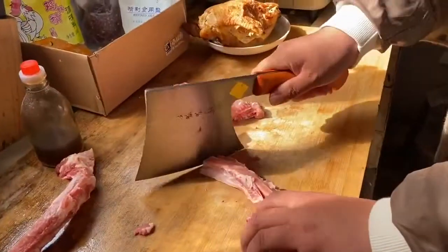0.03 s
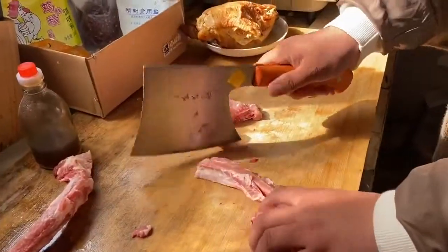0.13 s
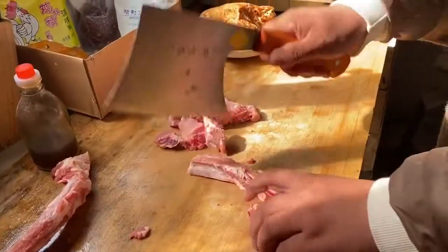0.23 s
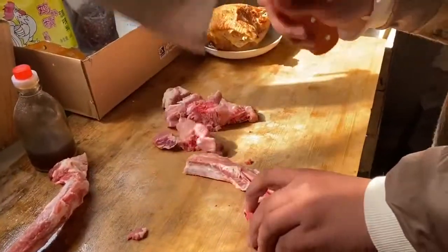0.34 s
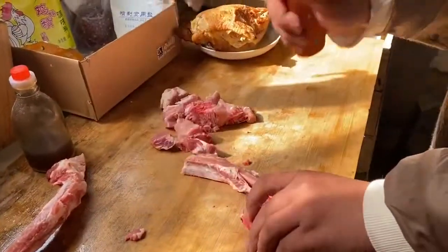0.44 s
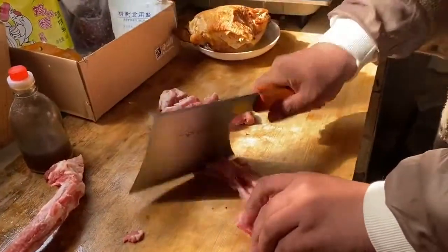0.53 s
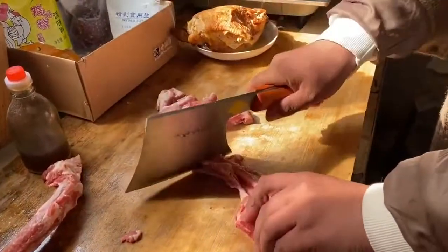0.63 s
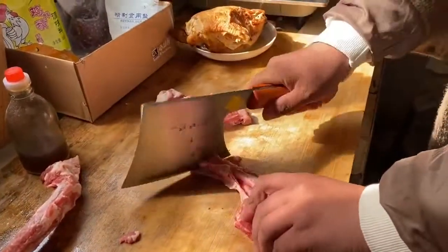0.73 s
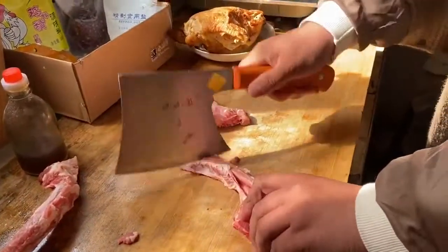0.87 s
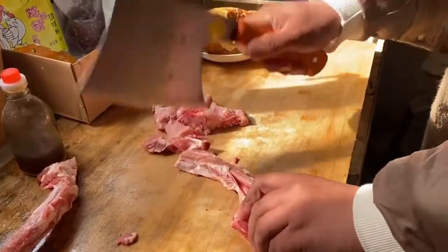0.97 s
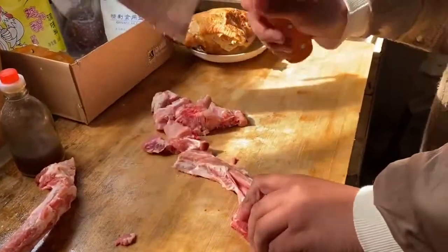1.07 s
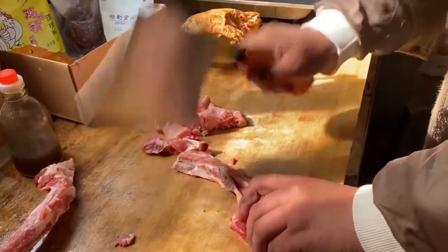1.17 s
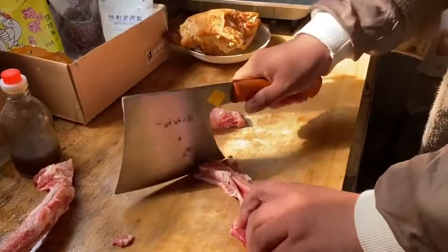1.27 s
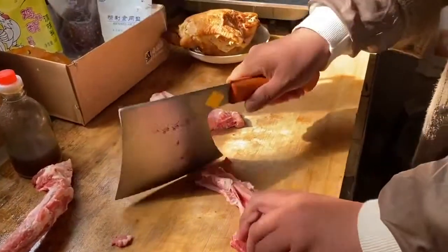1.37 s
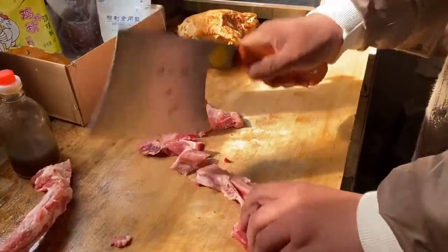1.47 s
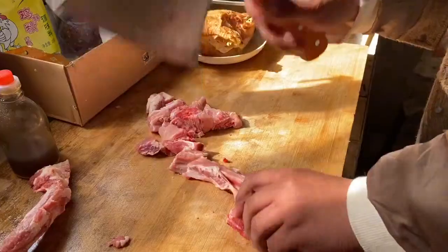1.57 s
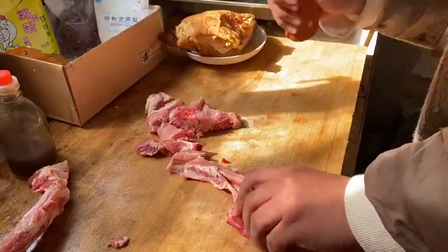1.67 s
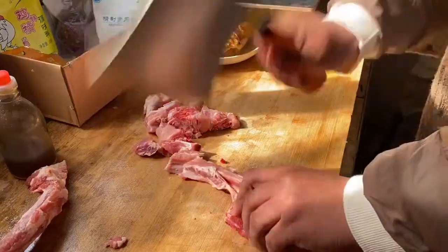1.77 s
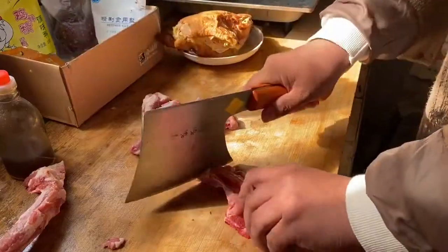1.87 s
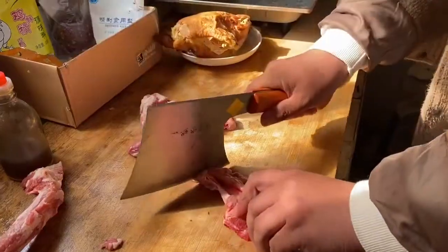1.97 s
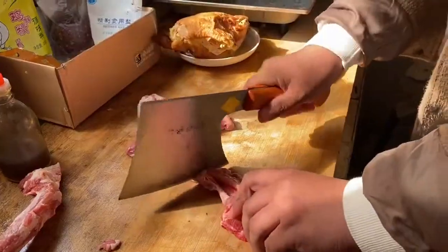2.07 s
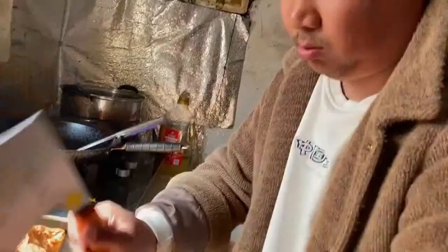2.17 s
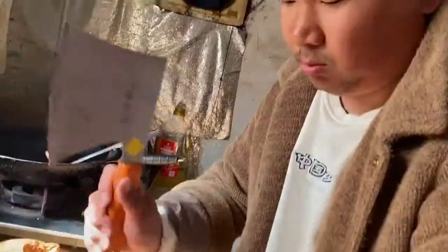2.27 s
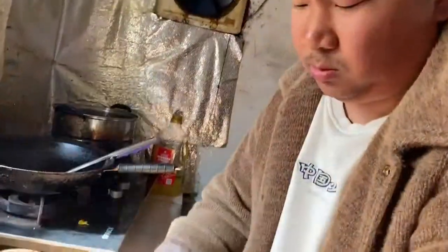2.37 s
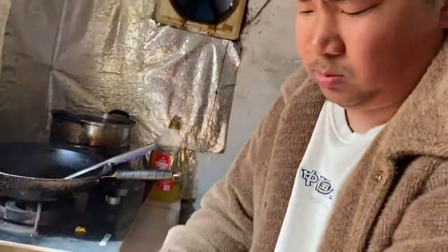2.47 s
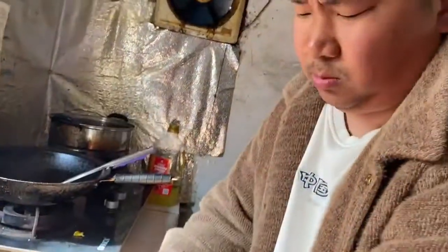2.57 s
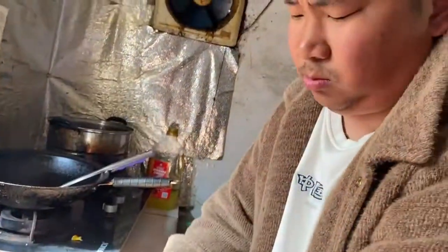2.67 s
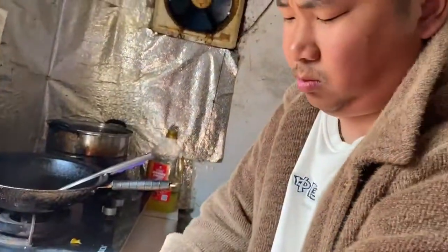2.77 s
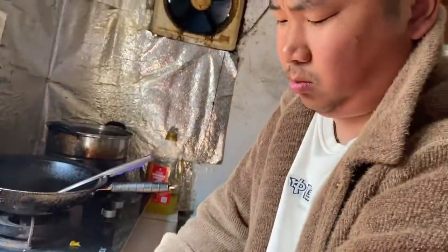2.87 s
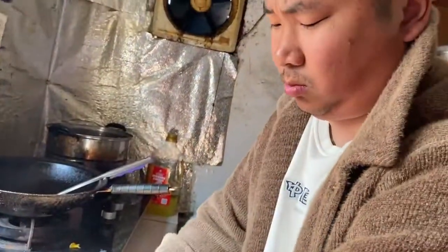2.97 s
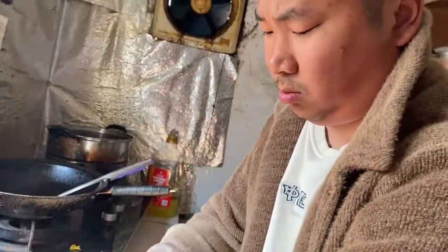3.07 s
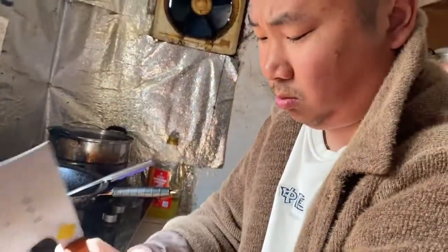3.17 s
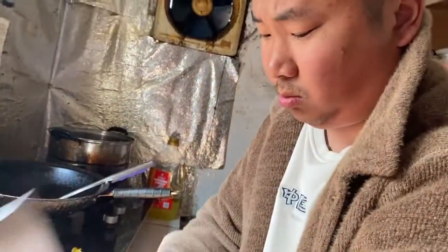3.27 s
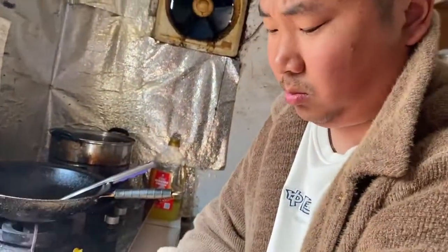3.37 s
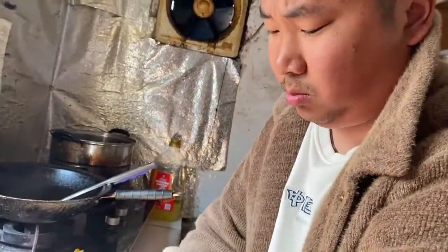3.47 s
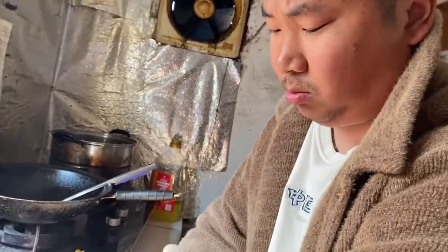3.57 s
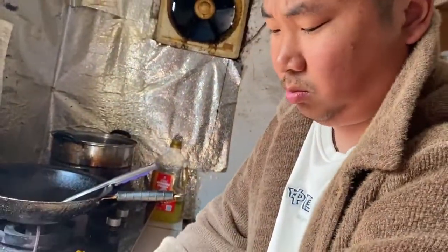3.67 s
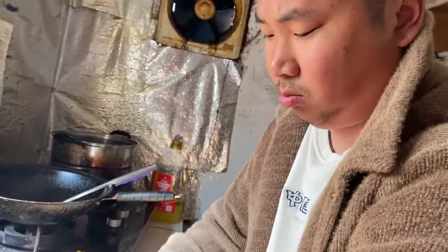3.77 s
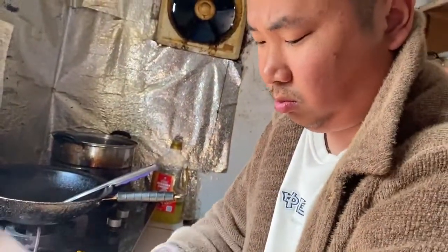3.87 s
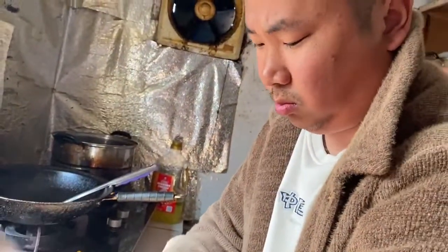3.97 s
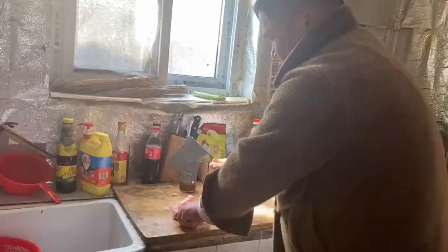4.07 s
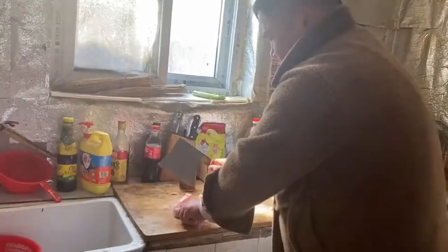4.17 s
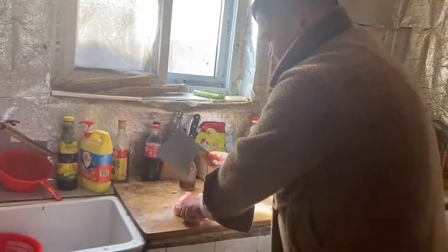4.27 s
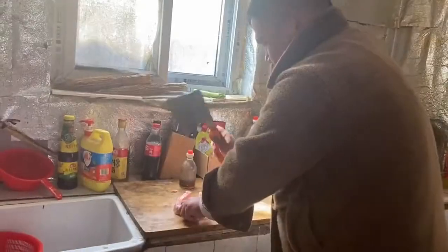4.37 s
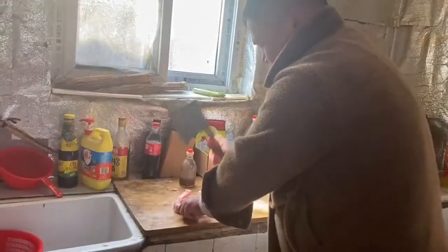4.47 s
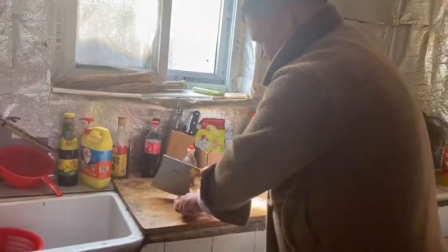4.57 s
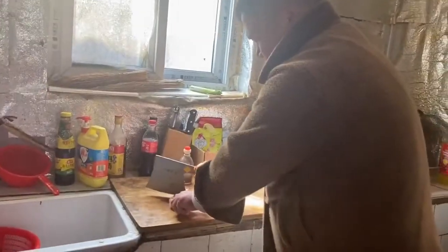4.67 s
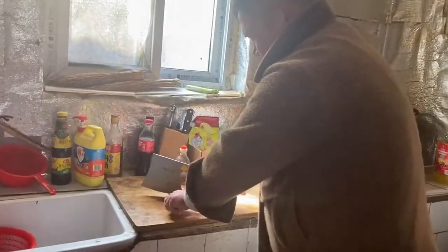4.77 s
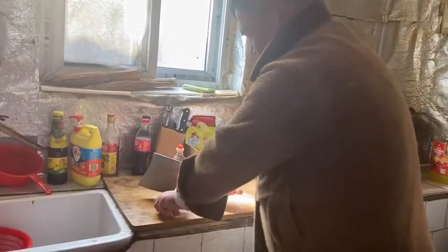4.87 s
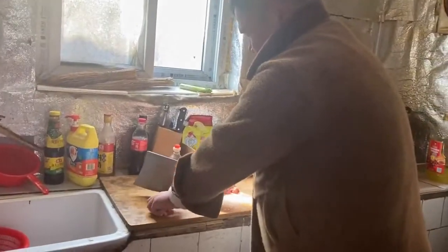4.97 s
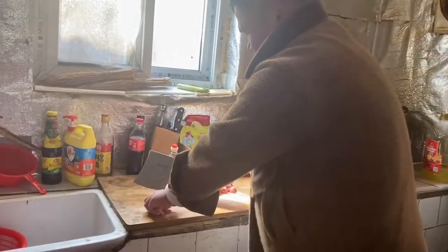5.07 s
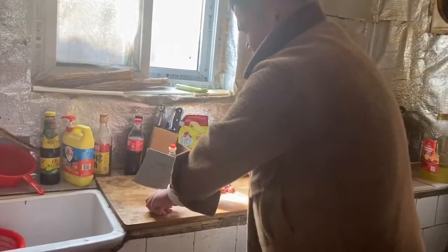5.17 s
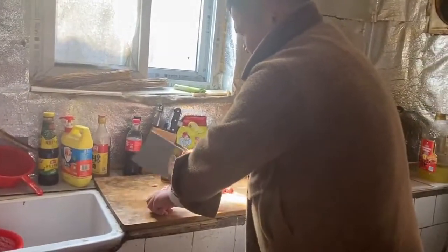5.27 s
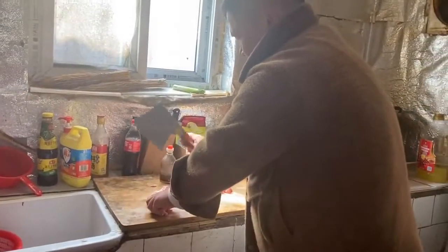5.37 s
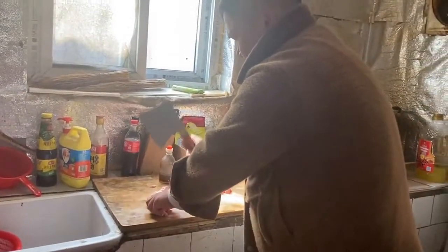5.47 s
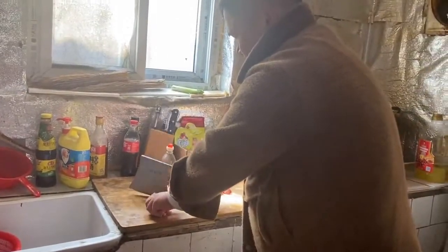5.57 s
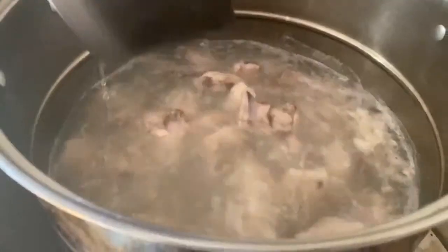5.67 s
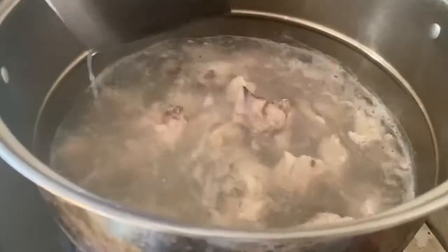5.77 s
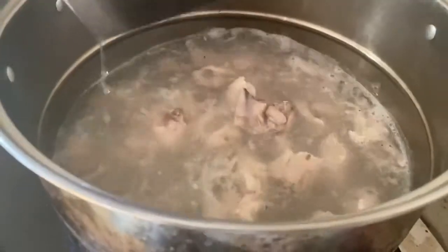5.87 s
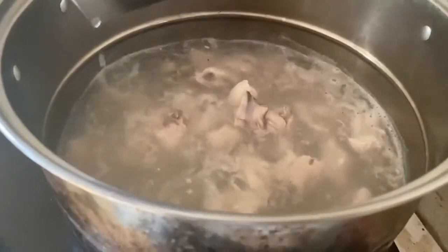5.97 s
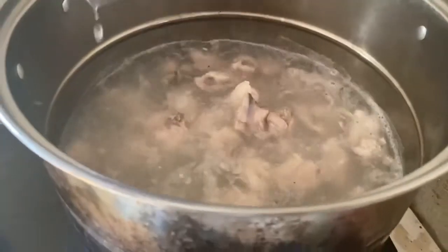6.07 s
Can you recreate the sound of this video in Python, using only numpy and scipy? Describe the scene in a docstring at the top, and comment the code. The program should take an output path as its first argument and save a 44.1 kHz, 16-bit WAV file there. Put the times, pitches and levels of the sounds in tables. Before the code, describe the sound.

Irregular, forceful chops split bone and strike wood, with short table boom, small clacks of pieces dropping and hardly audible blade touches between. The close, nearly silent background gives way abruptly to a more distant view with low stove rumble and higher-pitched knocks. The last blow is cut off by dense, fizzy boiling over a low flame rumble, with one dull bump near the end.

```python
"""Impact and fracture: chopping ribs in a kitchen

A heavy cleaver chops pork ribs on a wooden worktop in a small kitchen. Each blow excites bone (grainy
noise, a rib resonance), blade, board and table (decaying modes), all scaled by its force; loose pieces
drop back, the blade touches and rings, and rubbing is grainy noise. The listening place jumps twice: from
a quiet spot by the board to one across the room where a stove rumbles (both shaped noise), then to a
pot: wavering flame noise under a fizz of random pops."""
import sys
import numpy as np
from scipy import signal
from scipy.fft import rfft, irfft, next_fast_len
from scipy.io import wavfile

SR = 44100
rng = np.random.default_rng(int(sys.argv[2]) if len(sys.argv) > 2 else 0)


def generate_wav(signal):
    """Clip the signal to [-1, 1] and save it as 16-bit WAV at the path in sys.argv[1]."""
    frames = np.transpose(np.atleast_2d(signal))
    scaled = np.clip(frames, -1, 1) * 32767
    pcm = np.round(scaled).astype(np.int16)
    wavfile.write(sys.argv[1], SR, pcm)


N = 269583

# Jumps of the listening place: t/s
JUMP_TIMES = [4.173, 5.706]
# Blows; bone, rib and thock levels are relative to the force: t/s, force level/dB, bone level/dB,
# bone brightness/(dB/octave), rib f/Hz, rib level/dB, thock f/Hz, thock level/dB
BLOWS = [(-.085, -18, -7.5, -4.5, 2500, -12, 228, 3.5), (0.6354, -17.5, -8.5, 2, 2544, -9, 326, 4.5),
         (1.3016, -13, -8.5, -2.5, 2512, -17, 325.5, 4.5), (1.9049, -13, -6, 1.4, 2620, -3, 354, -6.5),
         (2.4961, -14, -3.5, 0.5, 2626, -8, 355.5, -0.5), (3.4140, -13, -7.5, 1, 4400, -16.5, 379, 1.5),
         (4.1190, -13, -10, -1.5, 1563, -8.5, 457.6, -1), (4.6247, -11, -8, 4.5, 2780, -15.5, 490, 10),
         (5.636, -12.5, -7, 0, 1740, -9.5, 429, 8)]
# Blade and bone pieces dropping back on the board: t/s, level/dB, brightness/(dB/octave), clack f/Hz
DROPS = [(.652, -15.5, -1, 789), (0.7055, -25.5, 0.4, 885), (1.978, -27, -0.5, 667),
         (2.578, -39.5, -3.5, 882), (3.517, -32, -5.5, 677), (4.690, -23, -4, 611), (4.762, -38, -5.5, 613),
         (4.879, -33, -1.5, 459)]
# Touches of the blade: t/s, tick level/dB, steel ring level/dB, f/Hz of the modes favoured at that spot,
# fall of the other modes/(dB/octave)
BLADE_TOUCHES = [(0.9465, -70, -90, 4980, 6), (2.211, -69, -69, 5180, 12.5), (3.05, -77.5, -64.5, 3600, 7),
                 (3.804, -75, -63.5, 5900, 5.5), (4.349, -58.5, -79, 4970, 3.5),
                 (4.877, -24, -29, 4300, 36), (5.126, -60, -71, 4430, 8)]
# Meat and steel sliding over wood: t/s, length/s, rise/s, level/dB, centre f/Hz, width/octave
STROKES = [(.17, 0.056, .01, -67.5, 2420, 0.81), (1.557, 0.13, .06, -64.5, 2615, .5),
           (2.235, 0.16, .02, -63.5, 1394, 0.63), (3.679, .06, .015, -65.5, 1660, 0.98),
           (3.77, 0.056, .03, -67, 2774, 1), (4.355, 0.085, .01, -63, 2290, 1.8),
           (4.879, 0.086, .002, -28.5, 4000, 1.9), (5.522, 0.2, .002, -42, 1007, 0.22),
           (5.525, 0.34, .002, -50, 1880, 0.44)]
# A faint squeak while the meat is shifted: t/s, length/s, f/Hz, level/dB
SQUEAK_TONE = (5.305, .1, 2205, -60)
# A dull bump beside the pot: t/s, level/dB, f/Hz, t60/s
POT_BUMP = (6.014, -21.5, 96, .3)
# The chopping as heard by the board, then across the room: lag of the thud behind the crack/s,
# knock brightness/(dB/octave), board mode level/dB, level of board and thock echo/dB, low cut f/Hz,
# left-right level/dB
LISTENING_SPOTS = [(.0007, -0.1, -2.5, -6, 18, 2.5), (.004, -1.2, -6.5, -2.5, 70, 1.5)]

# Modes of the wooden board: f/Hz, level/dB, t60/s
BOARD_MODES = [(160.8, -12.5, 0.18), (226.1, -11, .38), (278.1, -3.5, 0.26), (334, -3, 0.037),
               (438.3, -6, .2), (526.5, -10.5, 0.052), (623, -7.5, 0.22), (723, -10.5, 0.29),
               (799, -8.5, .12), (897, -11, 0.097), (927, -10.5, 0.2), (1063, -12, 0.21), (1178, -9, 0.14),
               (1327, -15, 0.055), (1600, -17, .12)]
# Low modes of the table: f/Hz, level/dB, t60/s
TABLE_MODES = [(52, -15, 0.083), (70.7, -0.5, .58), (99.1, -3, 0.55), (129.6, 3, 0.15)]
# Modes of the steel blade: f/Hz, level/dB, t60/s
STEEL_MODES = [(2200, -10, .12), (2530, -4, .13), (2870, -6, .14), (3088, -9, .42), (3800, -12, .1),
               (4503, -1, .27), (4845, -3, .26), (5675, -7, .2), (6094, -13, .12), (6923, -11, .18),
               (7680, -11, .14), (11400, -7, .12)]

# Spectrum of splintering bone: f/Hz, relative level/dB
BONE_SPECTRUM = [(100, -24), (600, -8), (1300, -1), (1900, -3), (2600, 2), (3300, -3), (4600, -2.5),
                 (5600, -8.5), (7900, -9.5), (9200, -23), (11300, -6.5), (13300, -18.5), (15200, -13.5),
                 (17000, -28)]
# Spectrum of the wooden clatter: f/Hz, relative level/dB
WOOD_SPECTRUM = [(30, -15), (70, -8.5), (130, -5), (180, -6.5), (260, -3), (380, 1.5), (580, 1.5),
                 (850, 1.5), (1200, -6), (1700, -11), (2700, -13.5), (4000, -24.5), (8000, -43.5),
                 (16000, -46)]
# Spectrum of the quiet spot: f/Hz, relative level/dB
QUIET_SPECTRUM = [(25, -27.5), (45, -12.5), (75, 2), (110, 2), (200, -6.5), (280, -3), (380, -10),
                  (480, -9), (600, -20), (900, -15.5), (1400, -25), (3000, -30), (7000, -35.5),
                  (16000, -47.5)]
# Spectrum of the stove's rumble: f/Hz, relative level/dB
STOVE_SPECTRUM = [(15, -77), (25, -24), (130, 3.5), (200, -12.5), (293, -12.5), (416, -23.5), (840, -25),
                  (1400, -34), (2160, -35.5), (3250, -41), (7310, -43.5), (9070, -58), (11300, -41.5),
                  (13200, -57), (16000, -44)]
# Spectrum of the flame under the pot: f/Hz, relative level/dB
FLAME_SPECTRUM = [(25, -35), (60, -10), (98, -1), (150, -5.5), (220, -12.5), (320, -25.5), (700, -31),
                  (1400, -59), (4000, -69), (16000, -83)]
# Spectrum of the bursting bubbles: f/Hz, relative level/dB
FIZZ_SPECTRUM = [(100, -13), (800, 4.5), (1500, -1), (3000, 0), (5000, 0), (7500, 1.5), (9200, -11.5),
                 (11500, 4.5), (13300, -11), (15000, 2.5), (17000, -5)]

# Decay of the kitchen's reverberation: f/Hz, t60/s
ROOM_DECAY = [(80, 0.8), (250, 0.2427), (700, 0.27), (1500, 0.2231), (3000, 0.09), (7000, 0.154),
              (14000, 0.11)]
# Strength of the reverberation: f/Hz, level/dB
ROOM_LEVEL = [(60, -8), (250, -4), (700, -10), (2000, -7.5), (6000, -5), (14000, -7)]
# Likeness of diffuse sound in the two channels: f/Hz, likeness/1
DIFFUSE_LIKENESS = [(100, 0.97), (300, 0.9), (600, 0.56), (1200, 0.26), (3000, 0.36), (8000, 0.91),
                    (15000, .85)]
# Phase by which the left channel leads: f/Hz, phase/rad
LEFT_LEAD = [(200, 0), (330, .15), (500, .6), (800, 1.1), (1400, 1.4), (2500, .8), (4600, .6), (6500, .2),
             (8400, -2), (15000, -2.3)]
# Level difference, as the left channel faces the board: f/Hz, left-right level/dB
LEFT_FACING = [(100, 1.5), (300, -.7), (550, 2), (1100, 2), (2200, -0.5), (5000, 1), (12000, -0.5)]

T = np.arange(SR) / SR  # time within one event, s
HZ = np.fft.rfftfreq(8192, 1 / SR) + 1  # frequency grid of the filters

# A brittle bone cracks faster and brighter: its time halves for each step of brightness
SPLINTER_S, BRITTLE_STEP_DB_PER_OCT = 0.011, 5.5
STEEL_DB = -11.5  # ring of the blade, relative to the bone
UNDERTONE, UNDERTONE_DB = .33, -16.5  # lowest thock mode: pitch ratio, level relative to the thock
OVERTONE, OVERTONE_DB = 2.3, -5.5  # upper thock mode: pitch ratio, level relative to the force
SHOVE_DB, TABLE_DB = -3, -9  # first dip and swing of the table, relative to the force
CLACK_DB = 2  # pitched part of a drop, relative to its clatter
RUB_GRAIN_DB, RUB_GRAINS_PER_S = 2.5, 500
FLAME_DB, FIZZ_DB = -35, -46
SURGE_DB, SETTLE_S = 10, 0.069  # extra level of the fizz at first, and its time constant
FLUTTER_PER_S, FLAME_FLUTTER_DB, FIZZ_FLUTTER_DB = 25, 2.5, 1.1
QUIET_DB, STOVE_DB = -59.5, -42.5
EDGE_HZ = 16200  # upper band limit


def chops(mix):
    """Impact: the edge splits the rib, then drives into the board, which sets the table swinging."""
    for s, force_db, bone_db, bright, rib_hz, rib_db, thock_hz, thock_db in BLOWS:
        spot = LISTENING_SPOTS[np.searchsorted(JUMP_TIMES, s)]
        lag, knock_bright, board_db, echo_db, cut_hz, pan_db = spot
        length = SPLINTER_S * 2 ** (-bright / BRITTLE_STEP_DB_PER_OCT)

        bone = amp(bone_db) * splinter(length, bright)
        ringing = amp(rib_db) * rib(rib_hz, length) + amp(bone_db + STEEL_DB) * gripped_blade()
        crack = kitchen(bone) + kitchen(ringing, wet_db=-6)
        add(mix, s, amp(force_db) * crack)

        clatter = knock(knock_bright, hold=0.016, fall=0.012)
        modes = amp(board_db) * board() + thock(thock_hz, thock_db)
        wood = kitchen(clatter) + kitchen(modes[None], echo_db)
        thud = low_cut(wood + table(), cut_hz)
        add(mix, s + lag, amp(force_db) * panned(thud, pan_db))


def splinter(length, brightness, grain_db=4, fall=0.01, shard_db=6, shard_width_hz=55):
    """Brittle fracture: a quick run of small, unequal cracks, whose shards have short pitches of their own."""
    grains = np.repeat(rng.exponential(1, SR), 16)[:SR]  # each crack lasts 16 samples
    sizes = amp(grain_db * np.minimum(grains, 3))
    pitches = np.geomspace(1100, 14000, 18) * rng.uniform(.93, 1.07, 18)
    shards = shard_db * sum(amp(peak(hz, shard_width_hz * np.sqrt(hz / 2000))) for hz in pitches)
    fracture = noise(SR) * sizes * swell(.002, length, fall)
    return burst(colour(fracture, read(BONE_SPECTRUM, HZ) + tilt(brightness) + shards))


def rib(hz, length, width_hz=170):
    """Resonance: the breaking rib filters a noise burst around its own pitch."""
    return burst(colour(noise(SR) * swell(0.0034, length, 0.0073), peak(hz, width_hz)))


def gripped_blade(grip_s=.012):
    """Damping: meat and wood grip the blade, so its modes die quickly."""
    return ring(STEEL_MODES) * swell(0.0039, 0, grip_s)


def knock(brightness, hold, fall):
    """Multiple impact: board, meat and the things standing on the board clatter as a noise burst."""
    clatter = noise(SR) * swell(0.00071, hold, fall)
    return burst(colour(clatter, read(WOOD_SPECTRUM, HZ) + tilt(brightness)))


def thock(hz, db):
    """Local modes: the patch under the blade rings at a pitch that depends on where the blow lands."""
    modes = [(UNDERTONE * hz, db + UNDERTONE_DB, .14),
             (hz, db, .1),
             (OVERTONE * hz, OVERTONE_DB, .085)]
    return ring(modes) * swell(0.00055, 0, 0.99)


def board():
    """Modal vibration: the whole board rings in its decaying modes."""
    return ring(BOARD_MODES) * swell(0.0024, 0, 0.48)


def table(push_s=0.0023):
    """Impulse response: the table top is first shoved down, then swings in its low modes."""
    push = (1 - T / push_s) * np.exp(-T / push_s) * swell(0.00081, 0, 0.94)
    swing = ring(TABLE_MODES) * (1 - np.exp(-T / 0.014))
    return amp(SHOVE_DB) * push + amp(TABLE_DB) * swing


def knocks(mix):
    """Secondary impact: the blade or a piece of bone drops back with a clatter and a pitched clack."""
    for s, db, bright, clack_hz in DROPS:
        clack = ring([(clack_hz, CLACK_DB, .12)]) * swell(0.00067, 0, 0.88)
        clatter = kitchen(knock(bright, hold=0.002, fall=0.012))
        add(mix, s, amp(db) * panned(clatter + clack, db=1.0))


def touches(mix):
    """Selective excitation: a touch ticks and rings the free blade, favouring modes near one pitch."""
    for s, tick_db, ring_db, spot_hz, fall_db in BLADE_TOUCHES:
        ping = ring([(hz, db - fall_db * abs(np.log2(hz / spot_hz)), t60) for hz, db, t60 in STEEL_MODES])
        tick = splinter(.001, 7.6, fall=0.0074)
        add(mix, s, kitchen(amp(tick_db) * tick) + amp(ring_db) * ping)


def slides(mix):
    """Stick-slip friction: meat and blade rub over wood, catching and letting go at random."""
    for s, length, rise, db, hz, octaves in STROKES:
        stroke = np.sqrt(np.clip(1 - T / length, 0, 1)) * swell(rise, 0, length)
        sizes = amp(RUB_GRAIN_DB * np.minimum(rng.exponential(1, SR), 3))
        grains = sizes[(T * RUB_GRAINS_PER_S).astype(int)]
        band = -20 * np.log10(1 + (np.log2(HZ / hz) / octaves) ** 2)
        rub = evened(colour(noise(SR) * grains, band))
        add(mix, s, kitchen(amp(db) * rub * stroke / stroke.max()))


def squeak(mix):
    """Tonal friction: one sine swells and fades as half a sine arch."""
    s, length, hz, db = SQUEAK_TONE
    arch = np.sin(np.pi * np.minimum(T / length, 1))
    add(mix, s, amp([[db], [db]]) * arch * np.sin(2 * np.pi * hz * T))


def pot():
    """Superposition: the flame rumbles under the fizzing pot, and one bump sounds beside it."""
    sound = flame() + fizz()
    s, db, hz, t60 = POT_BUMP
    add(sound, s, ring([(hz, db, t60)])[None])
    return sound


def flame():
    """Combustion noise: a low rumble whose level wavers at random."""
    return amp(FLAME_DB) * drone(FLAME_SPECTRUM) * waver(FLAME_FLUTTER_DB)


def fizz(pops_per_s=2500, pop_db=4.0, hiss=0.97):
    """Random impulses: countless tiny bubbles burst over the surface, with a surge that settles."""
    sizes = amp(pop_db * np.minimum(rng.exponential(1, (2, N)), 4)) * rng.choice([-1, 1], (2, N))
    pops = (rng.random((2, N)) < pops_per_s / SR) * sizes
    bubbles = evened(pops) + hiss * rng.standard_normal((2, N))
    shaped = evened(colour(bubbles, read(FIZZ_SPECTRUM, HZ)))
    since = np.maximum(np.arange(N) / SR - JUMP_TIMES[1], 0)
    level_db = FIZZ_DB + SURGE_DB * np.exp(-since / SETTLE_S)
    return amp(level_db) * shaped * waver(FIZZ_FLUTTER_DB)


def stove():
    """Stationary noise: the stove rumbles, a little louder on the left."""
    return amp(STOVE_DB) * panned(drone(STOVE_SPECTRUM), db=2.4)


def quiet_spot():
    """Stationary noise: a faint, mostly low background by the board."""
    return amp(QUIET_DB) * panned(drone(QUIET_SPECTRUM), db=2.0)


def drone(spectrum):
    """Filtered noise: a steady sound with the given spectrum and rms 1."""
    return evened(colour(noise(next_fast_len(N))[:, :N], read(spectrum, HZ)))


def waver(db):
    """Slow modulation: a gain that wanders at random by about db."""
    t = np.arange(N) / SR * FLUTTER_PER_S
    knots = rng.standard_normal(SR)
    return amp(db * np.interp(t, np.arange(SR), knots))


def kitchen(x, wet_db=0, build_up=0.0072, late_db=-27, late_t60=.55, late_top_hz=4500):
    """Reverberation: echoes decay at a rate set by frequency, and a faint, dull late tail lingers."""
    hz, t, z = signal.stft(noise(SR), SR, nperseg=256)
    t60 = read(ROOM_DECAY, hz)[:, None]
    late = amp(late_db - 60 * t / late_t60) / (1 + (hz[:, None] / late_top_hz) ** 2)
    decay = amp(-60 * t / t60) + late
    level = amp(read(ROOM_LEVEL, hz)[:, None] + wet_db)
    z = z * level * decay * np.sqrt(np.log(1e6) / t60 / SR)  # the root evens out the energy of the decays
    tail = signal.istft(z, SR, nperseg=256)[1][:, :SR] * (1 - np.exp(-(T / build_up) ** 2))
    return x + signal.fftconvolve(x, tail, axes=1)[:, :SR]


def off_axis(x):
    """Directional hearing: sound from one side reaches the channels with different phase and level."""
    size = next_fast_len(N + SR)
    hz = np.fft.rfftfreq(size, 1 / SR)
    left = np.exp(.5j * read(LEFT_LEAD, hz)) * amp(read(LEFT_FACING, hz) / 2)
    return irfft(rfft(x, size) * np.array([left, 1 / left]), size)[:, :N]


def ports(x):
    """Diffuse-field coherence: two unrelated signals become partly alike, by frequency."""
    alike = np.clip(read(DIFFUSE_LIKENESS, np.fft.rfftfreq(x.shape[1], 1 / SR)), 0, 1)
    a, b = rfft(x)
    return irfft(np.array([a, alike * a + np.sqrt(1 - alike ** 2) * b]), x.shape[1])


def noise(size):
    """Diffuse noise: white in both channels and partly alike."""
    return ports(rng.standard_normal((2, size)))


def panned(x, db):
    """Level difference: makes the left channel louder than the right by db."""
    return x * amp([[db / 2], [-db / 2]])


def ring(modes):
    """Modal synthesis: a struck object sounds as a sum of decaying sines."""
    return sum(amp(db - 60 * T / max(t60, .005)) * np.sin(2 * np.pi * hz * T) for hz, db, t60 in modes)


def swell(rise, hold, fall):
    """Exponential envelope: rises from the onset and dies away after the hold (all in s)."""
    return (1 - np.exp(-T / rise)) * np.exp(-np.maximum(T - hold, 0) / fall)


def peak(hz, width_hz):
    """Resonance curve: one peak, in dB over HZ."""
    return -20 * np.log10(1 + ((HZ - hz) / width_hz) ** 2)


def tilt(db_per_octave):
    """Spectral slope: zero at 1 kHz, level below 250 Hz."""
    return db_per_octave * np.log2(np.maximum(HZ, 250) / 1000)


def colour(x, db):
    """Minimum-phase filter: a causal response with the gain db over HZ, its peak set to 0 dB."""
    log_gain = np.log(amp(np.maximum(db - db.max(), -100)))
    circle = np.concatenate([log_gain, log_gain[-2:0:-1]])
    # the Hilbert transform of the log gain gives the phase
    taps = np.fft.ifft(np.exp(np.conj(signal.hilbert(circle)))).real[:len(HZ)]
    return signal.oaconvolve(x, taps[None], axes=1)[:, :x.shape[1]]


def low_cut(x, hz):
    """High-pass filter: takes away the deepest bass."""
    return signal.sosfilt(signal.butter(2, hz, "high", fs=SR, output="sos"), x)


def amp(db):
    """Level: decibels to gain."""
    return 10 ** (np.asarray(db) / 20)


def read(points, hz):
    """Interpolation: a table's value on a log-frequency axis."""
    f, value = np.transpose(points)
    return np.interp(np.log(hz + 1), np.log(f + 1), value)


def evened(x):
    """Power normalisation: scales to rms 1."""
    return x / np.sqrt(np.mean(x ** 2) + 1e-20)


def burst(x):
    """Energy normalisation: a short sound gets the energy of a fiftieth of a second at rms 1."""
    return evened(x) * np.sqrt(SR / 50 / x.shape[-1])


def stretch(index):
    """Gating: one of the three stretches between the jumps, with 3 ms crossfades."""
    edges, t = [-1, *JUMP_TIMES, N], np.arange(N) / SR
    fade_in = np.clip((t - edges[index]) / .003, 0, 1)
    fade_out = np.clip((edges[index + 1] - t) / .003 + 1, 0, 1)
    return fade_in * fade_out


def add(mix, s, sound):
    """Superposition: lays a sound in at s; it ends with its stretch."""
    start = round(s * SR)
    sound = sound[:, max(-start, 0):]  # an event before time zero is heard from its middle
    first = max(start, 0)
    part = mix[:, first:][:, :sound.shape[1]]
    gate = stretch(np.searchsorted(JUMP_TIMES, s))[first:][:part.shape[1]]
    part += sound[:, :part.shape[1]] * gate


def scene():
    """Superposition: the work at the board over the background of each stretch."""
    work = np.zeros((2, N))
    for source in (chops, knocks, touches, slides, squeak):
        source(work)
    return off_axis(work) + pot() * stretch(2) + stove() * stretch(1) + quiet_spot() * stretch(0)


def record(dry):
    """Saturation and band limit: the loudest peaks are rounded off, then the top treble is cut."""
    rounded = dry / (1 + (dry / .97) ** 6) ** (1 / 6)
    low_pass = signal.firwin(255, EDGE_HZ, window=("kaiser", 9), fs=SR)
    return signal.oaconvolve(rounded, low_pass[None], "same")


dry = scene()
out = record(dry)
generate_wav(out)
```